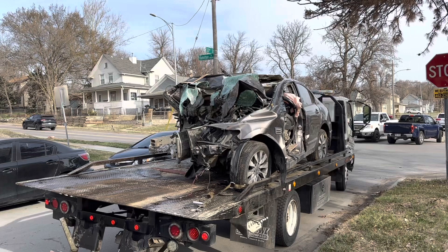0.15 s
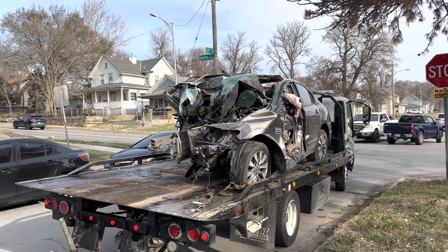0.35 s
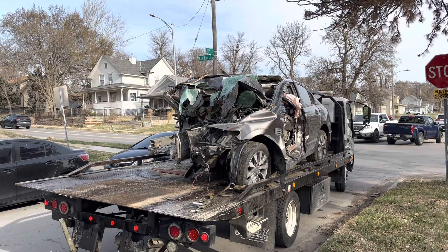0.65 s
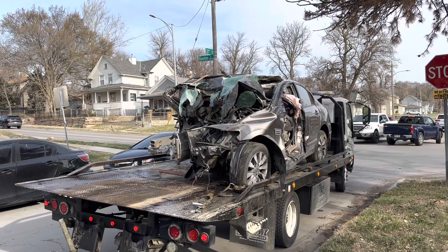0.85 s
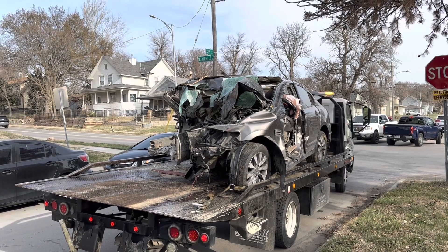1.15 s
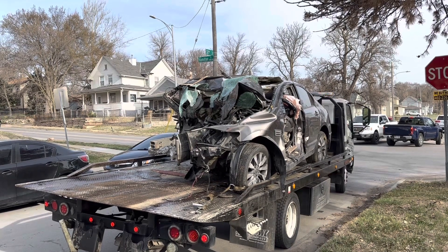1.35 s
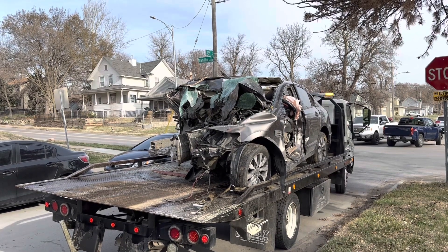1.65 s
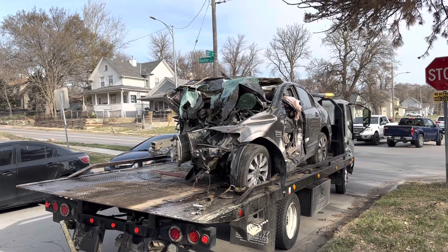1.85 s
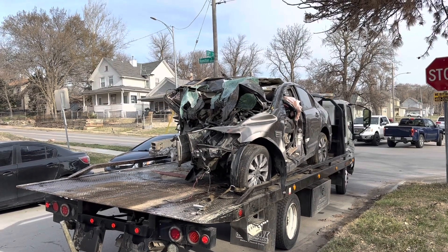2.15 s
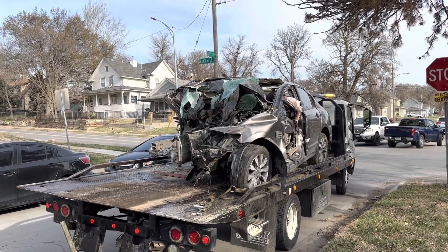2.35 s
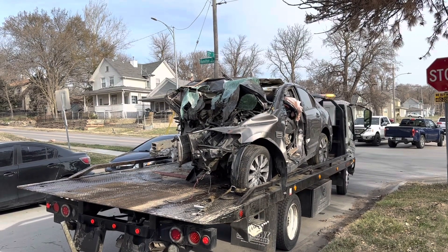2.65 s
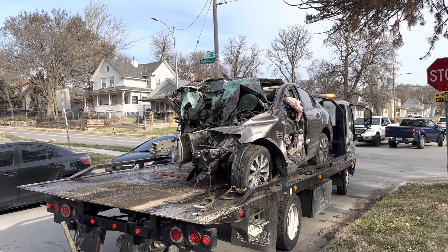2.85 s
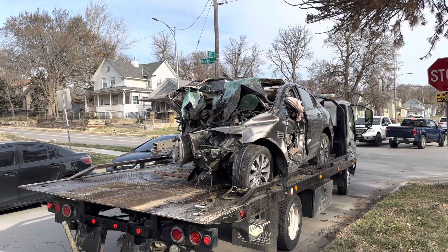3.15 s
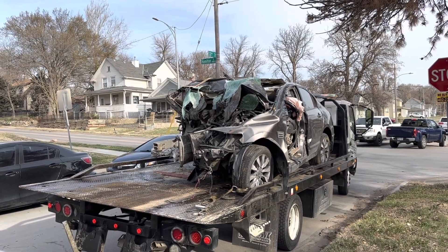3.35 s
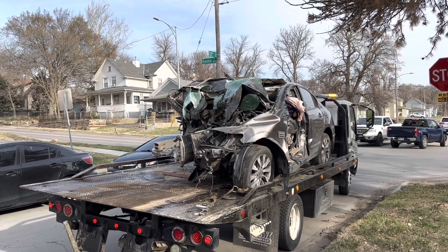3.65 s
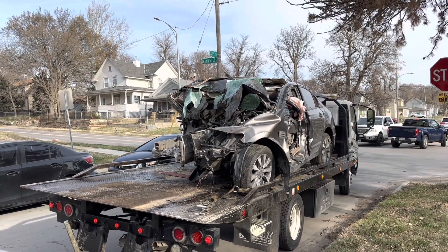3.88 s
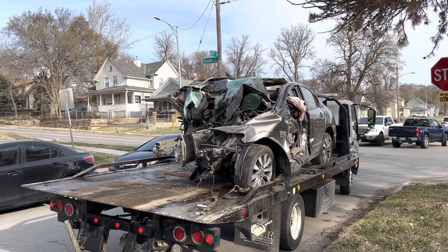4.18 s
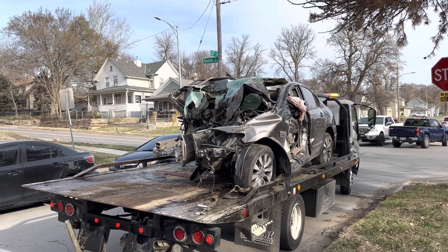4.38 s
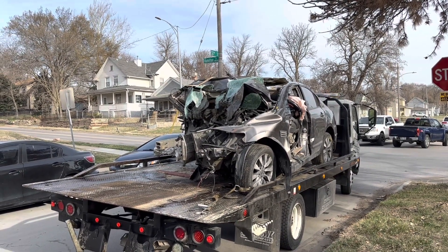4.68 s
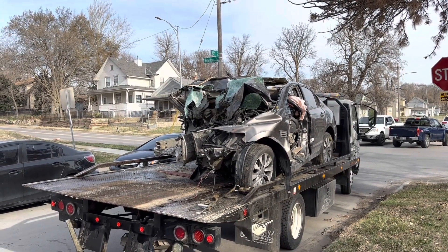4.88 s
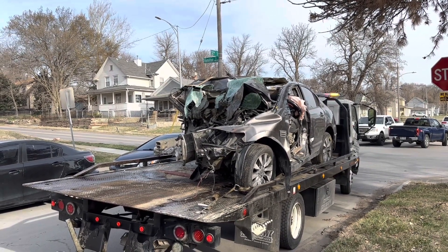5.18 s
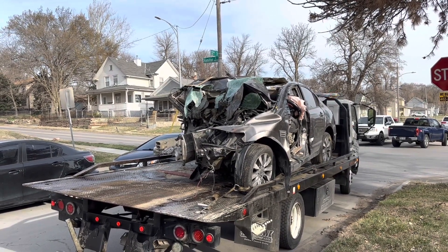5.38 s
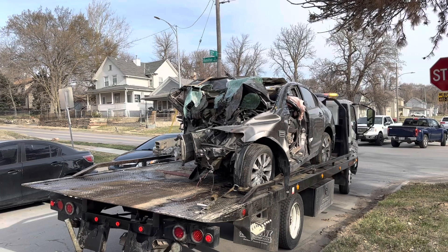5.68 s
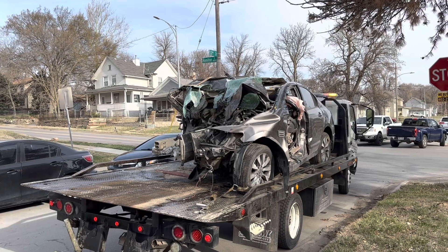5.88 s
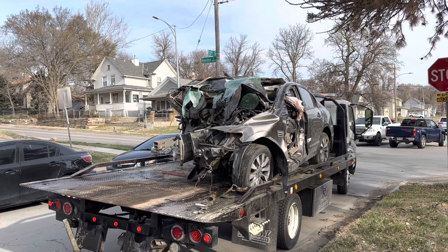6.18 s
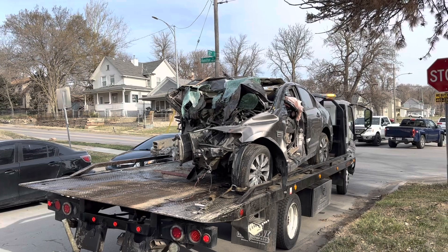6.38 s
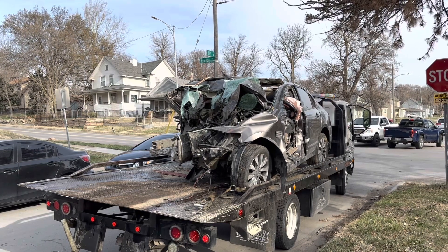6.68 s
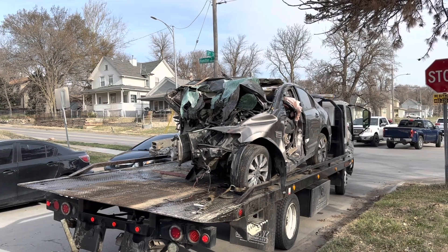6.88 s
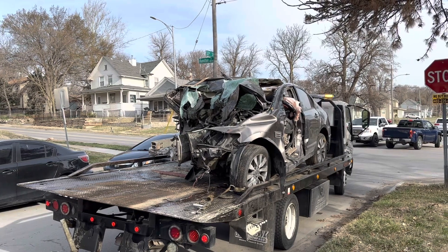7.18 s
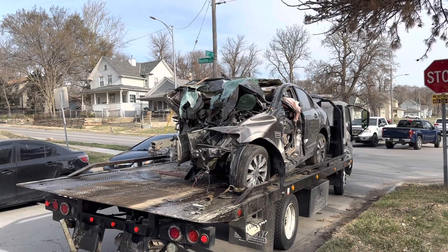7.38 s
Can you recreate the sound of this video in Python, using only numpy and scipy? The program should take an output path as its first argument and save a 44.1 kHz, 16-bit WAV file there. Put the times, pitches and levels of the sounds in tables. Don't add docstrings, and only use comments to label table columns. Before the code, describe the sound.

Close outdoor stereo recording of an idling truck engine, constant throughout: quick rattling knocks, dry valve clatter and a mid-pitched whine, with exhaust hum strongest at the start. Wind soon buffets the microphone with dull, boomy puffs and sharper pops, densest in the first half and hardest just after four seconds. The gusts thin out, leaving the engine clear, then return briefly around six and seven seconds.

```python
import sys
import numpy as np
from scipy import signal
from scipy.fft import rfft, irfft
from scipy.io import wavfile

SR = 44100
rng = np.random.default_rng(int(sys.argv[2]) if len(sys.argv) > 2 else 0)


def store_pcm(level_fs):
    pcm = np.round(np.clip(level_fs, -1, 1) * 32767).astype(np.int16)
    wavfile.write(sys.argv[1], SR, np.atleast_2d(pcm).T)


def amplitude_ratio(level_db):
    exponent = np.asarray(level_db, float) / 20
    return 10 ** exponent


N = 332066

CYCLE_HZ = 10.832
LEFT_RIGHT = np.array([[1], [-1]])

FIRING_STRENGTH = [0.5, -2.5, -0.5, 5.0, -3.0, 0.5, -1.5, -2.5]
# time_s, change_db
WIND_FILTER_DIP = [(0, 0), (1.74, 0.5), (1.97, -4.5), (2.6, -6.5), (2.9, -7.5), (3.73, -1.5), (4.07, 0),
                   (4.3, -6), (4.6, -2), (5.35, -1.5), (6.06, -2.5), (6.48, -0.5), (7.53, -1)]


def rms_one(x):
    return x / np.sqrt(np.mean(x ** 2) + 1e-20)


def in_time(rows):
    s, *columns = np.transpose(rows)
    return [np.interp(np.arange(N) / SR, s, c) for c in columns]


def at_hz(points, hz):
    table_hz, value = np.transpose(points)
    return np.interp(np.log(hz + 1), np.log(table_hz + 1), value)


def drift(rate_hz):
    r = np.exp(-80 * np.pi * rate_hz / SR)
    noise = rng.standard_normal(N // 40 + 4002)
    slow = signal.lfilter([1], [1, -2 * r, r * r], noise)[4000:]
    return np.interp(np.arange(N) / 40, np.arange(len(slow)), rms_one(slow - slow.mean()))


def band(x, low_hz, high_hz):
    sos = signal.butter(2, [low_hz, min(high_hz, .45 * SR)], "band", fs=SR, output="sos")
    return signal.sosfilt(sos, x)


def knock(cycles):
    # pitch_hz, level_db (rms), ring_s (time to fall 60 dB)
    block_tones = [(740, -47, .08), (870, -47, .11), (895, -51, .1), (945, -54, .1), (986, -48.5, .15),
                   (1035, -57, .1), (1116, -49, .15), (1153, -54, .12), (1212, -49, .12), (1257, -52, .12),
                   (1300, -49, .12), (1386, -50, .25), (1428, -50, .22), (1552, -51.5, .2),
                   (1640, -54, .15), (1850, -55, .2), (1891, -51.5, .18), (1933, -53, .25),
                   (2160, -56, .15), (2268, -53.5, .25), (2310, -55, .25), (2429, -52, .25),
                   (2549, -57, .2), (2771, -57, .25), (2650, -57, .05), (2860, -58, .05), (2939, -57, .25),
                   (4160, -63, .1), (4245, -61, .1), (4330, -66, .1), (1050, -51, .045), (1200, -53, .03),
                   (1480, -55, .04)]
    firing = np.floor(8 * cycles).astype(int)
    at = np.flatnonzero(np.diff(firing)) + 1
    cylinder = firing[at] % 8
    strength = amplitude_ratio(np.array(FIRING_STRENGTH))
    out = np.zeros((2, N))
    for hz, db, ring_s in block_tones:
        coupling = .35 + .8 * rng.standard_normal((2, 8))
        coupling[:, 3] = 1.35 * rng.choice([-1, 1], 2) * min(1, 1300 / hz) ** 2
        loose = np.clip((hz / 2200) ** 3, .13, 1)
        steady_hits = (strength * coupling)[:, cylinder]
        chance_hits = rng.standard_normal((2, len(at)))
        clicks = np.full((2, N), 1e-18)
        clicks[:, at] = (1 - loose) * steady_hits + loose * chance_hits
        r = amplitude_ratio(-60 / (max(ring_s, .005) * SR))
        w = 2 * np.pi * hz / SR
        rung = signal.lfilter([0, np.sin(w)], [1, -2 * r * np.cos(w), r * r], clicks)
        out += amplitude_ratio(db) * rung / np.std(rung, axis=1, keepdims=True)
    return amplitude_ratio(-0.5) * rfft(out)


def clatter(cycles):
    # pitch_hz, level_db (per Hz)
    clatter_colour = [(30, -25), (45, 5), (150, 0.5), (240, 2.5), (450, 0), (900, 2.5), (1600, -0.5),
                      (2950, -7), (3150, -9.5), (4300, -12), (6500, -20.5), (9000, -27.5), (12000, -33.5),
                      (15800, -33)]
    # pitch_hz, share (0-1)
    repeating_share = [(60, 0.45), (1200, 0.42), (1800, 0.18), (5000, 0.08), (12000, 0.05)]
    level_db = -37.5
    hz = np.arange(N // 2 + 1) * SR / N
    firing = 8 * cycles
    strength_db = np.array(FIRING_STRENGTH)[firing.astype(int) % 8]
    beat = amplitude_ratio(0.15 * strength_db - 0.5 * (firing % 1))
    place_in_cycle = (cycles % 1 * SR / CYCLE_HZ).astype(int)
    pattern = rng.standard_normal((2, 5000))[:, place_in_cycle]
    fresh = rng.standard_normal((2, N))
    share = np.clip(at_hz(repeating_share, hz), 0, 1)
    ripple_db = 1.5 * np.interp(hz, np.arange(800) * 30, rng.standard_normal(800))
    ripple_db = ripple_db * np.clip(hz / 2500 - .8, 0, 1)
    noise = np.sqrt(share) * rfft(beat * pattern) + np.sqrt(1 - share) * rfft(beat * fresh)
    both = amplitude_ratio(at_hz(clatter_colour, hz) + ripple_db) * noise
    return amplitude_ratio(level_db) * both / np.sqrt(2 * np.sum(np.abs(both[0, hz > 700]) ** 2)) * N


def two_ports(direct, scattered):
    # pitch_hz, likeness (0-1), left_lead_radians, left_minus_right_db
    port_rows = [(60, .96, 0, .8), (700, .8, 0, .5), (1300, .4, -1.6, -4), (1600, .35, -.6, -6),
                 (1900, .75, .1, .5), (2300, .55, .4, 1.5), (2900, .55, 1.1, 6.3), (3500, .2, -.4, 2),
                 (4150, .7, .3, -2), (5100, .15, .4, 2.5), (6900, .4, 2.6, 1.2), (7500, .1, 2.8, .8)]
    treble_rows = [(8300, .9, 0, 0), (8900, .9, 0, 0), (9600, .5, -1.2, 0), (10350, 1, -np.pi, 0),
                   (12350, 1, -np.pi, 0), (12750, .5, -1.5 * np.pi, 0), (13200, 1, -2 * np.pi, 0)]
    hz, *columns = np.transpose(port_rows + treble_rows)
    alike, lead, lean_db = [np.interp(np.arange(len(direct)) * SR / N, hz, c) for c in columns]
    alike = np.clip(alike, 0, 1)
    right = alike * np.exp(-1j * lead) * direct + np.sqrt(1 - alike ** 2) * scattered
    return irfft(np.array([direct * amplitude_ratio(lean_db / 2), right * amplitude_ratio(-lean_db / 2)]), N)


def whine(cycles):
    # time_s, level_db
    thrum_fade = [(0, -26), (1.7, -32.5), (2.0, -46), (4.3, -43), (4.6, -56), (7.53, -47)]
    pump_hz, pump_db, octave_db = 292.65, -37.5, -33.5
    port_lead = 0.096
    (cut_db,), (thrum_db,) = in_time(WIND_FILTER_DIP), in_time(thrum_fade)
    stroke = 2 * np.pi * pump_hz * np.arange(N) / SR + .25 * drift(2.5)
    stroke = stroke + port_lead * LEFT_RIGHT
    throb_db = 2.0 * drift(10.4) + 2.6 * np.cos(2 * np.pi * cycles + 0.28)
    octave = amplitude_ratio(octave_db + cut_db + 0.43 * drift(14.0)) * np.sin(2 * stroke)
    pump = amplitude_ratio(pump_db + cut_db - 1.5 + throb_db) * np.sin(stroke)
    thrum = np.sin(8 * np.pi * cycles) + amplitude_ratio(-7.0) * np.sin(16 * np.pi * cycles + 1)
    return np.sqrt(2) * (octave + pump + amplitude_ratio(thrum_db - 6.5) * thrum)


def eddies():
    # peak_s, peak_db, pitch_hz
    deep_thumps = [(1.432, -19, 160), (1.46, -14, 60), (1.466, -17, 130), (1.488, -24, 160),
                   (1.53, -11.5, 148), (1.556, -16.5, 120), (1.641, -18.5, 120), (1.67, -20.0, 160),
                   (1.701, -11.5, 120), (1.708, -18, 60), (1.734, -11, 159), (1.741, -23, 70),
                   (1.747, -6, 150), (1.757, -21.0, 150), (1.776, -16, 70), (1.799, -10.5, 150),
                   (1.817, -19.5, 80), (2.018, -22, 150), (2.1, -21, 120), (2.121, -17, 150),
                   (2.177, -16, 100), (2.352, -21, 130), (2.529, -22, 160), (2.551, -21, 160),
                   (2.573, -15, 80), (2.649, -22, 150), (2.663, -14.0, 80), (2.867, -20, 120),
                   (2.939, -18, 70), (3.111, -18, 99), (3.123, -16, 160), (3.239, -17.5, 101),
                   (3.29, -22, 90), (3.312, -20, 90), (3.325, -17, 150), (3.441, -16.5, 150),
                   (4.027, -17.5, 120), (4.138, -9, 99), (4.163, -21, 80), (4.247, -18, 150),
                   (4.264, -16.5, 120), (4.285, -17, 130), (4.295, -18, 70), (4.337, -18.5, 150),
                   (4.384, -24, 160), (4.477, -25, 120), (4.712, -16.5, 150), (4.861, -19.5, 120),
                   (4.904, -21, 80), (5.248, -23, 99), (6.217, -17.0, 160), (6.27, -15, 100),
                   (6.322, -18.5, 130), (6.342, -22, 70), (7.09, -19, 160), (7.117, -15.5, 100),
                   (7.133, -19.0, 120), (7.164, -15, 120), (7.186, -20, 120), (7.2, -18, 160)]
    middling_puffs = [(1.427, -17.5, 250), (1.465, -10, 230), (1.523, -16, 250), (1.531, -16.0, 310),
                      (1.696, -16.5, 250), (1.721, -16.5, 250), (1.766, -10.5, 180), (1.779, -21, 180),
                      (1.805, -16.5, 250), (1.957, -10, 304), (1.972, -15.5, 201), (2.011, -15.5, 249),
                      (2.039, -19, 180), (2.092, -14.0, 180), (2.107, -14, 200), (2.148, -16.5, 180),
                      (2.205, -16.5, 250), (2.232, -19, 200), (2.25, -16.5, 310), (2.266, -16.0, 228),
                      (2.558, -11.5, 310), (2.618, -16, 280), (2.631, -21, 250), (2.673, -16, 180),
                      (2.7, -17.0, 230), (3.119, -10.5, 250), (3.125, -19, 312), (3.287, -15.5, 202),
                      (3.298, -12.5, 310), (3.314, -12.5, 200), (3.337, -12, 250), (3.593, -13.5, 305),
                      (4.085, -16, 250), (4.119, -18.0, 180), (4.131, -15, 310), (4.136, -5.5, 202),
                      (4.153, -14, 230), (4.177, -16, 180), (4.228, -20, 179), (4.257, -20, 310),
                      (4.278, -11, 200), (4.304, -17, 200), (4.399, -16.5, 310), (4.408, -16, 310),
                      (4.441, -13, 310), (4.492, -18, 250), (4.843, -16, 200), (4.86, -19, 280),
                      (4.976, -15.5, 201), (5.241, -11.0, 228), (6.228, -15.0, 278), (6.267, -19, 250),
                      (6.317, -21, 230), (7.121, -11, 200), (7.172, -12, 250), (7.179, -12.5, 180),
                      (7.184, -8, 310), (7.226, -14, 230), (7.256, -13.5, 250), (7.268, -17, 180)]
    quick_snaps = [(1.741, -17, 390), (1.764, -18.5, 390), (1.798, -15.5, 350), (2.021, -16.5, 440),
                   (2.074, -17.5, 350), (2.091, -17, 390), (2.105, -17, 490), (2.116, -18, 350),
                   (2.2, -19, 390), (2.222, -25, 760), (2.223, -12, 443), (2.229, -18, 760),
                   (2.232, -12, 390), (2.256, -16, 390), (2.261, -17, 550), (2.361, -16, 437),
                   (2.52, -16, 490), (2.526, -17, 440), (2.555, -12.5, 760), (2.557, -18, 550),
                   (2.587, -18, 390), (2.596, -15.5, 490), (2.626, -17.5, 760), (2.628, -13, 440),
                   (2.631, -16, 550), (2.641, -10.5, 350), (2.649, -11.5, 670), (2.65, -15.5, 350),
                   (2.657, -14.5, 487), (2.678, -17.0, 390), (2.891, -16, 440), (2.919, -15, 350),
                   (3.101, -15, 355), (3.234, -13.5, 344), (3.295, -22, 550), (3.332, -15.5, 606),
                   (4.082, -19.5, 490), (4.128, -15.5, 950), (4.129, -5, 494), (4.131, -22, 680),
                   (4.139, -21, 390), (4.147, -18.5, 390), (4.222, -12, 352), (4.23, -12.5, 352),
                   (4.248, -13.5, 392), (4.276, -18, 610), (4.379, -14.0, 390), (4.384, -16.5, 350),
                   (4.394, -9.5, 350), (4.448, -19, 350), (4.894, -19.5, 487), (4.949, -18, 350),
                   (6.26, -19.0, 390), (6.34, -21, 390), (7.116, -16.5, 390), (7.191, -20, 440),
                   (7.223, -17.5, 490), (7.261, -20, 680), (7.261, -14.0, 350), (7.269, -18.0, 350)]
    stray_eddies = [(.27, -20.5, 150), (.505, -25.5, 190), (1.239, -22, 170), (1.308, -18.5, 192),
                    (1.89, -20.5, 250), (2.293, -21, 300), (2.33, -22, 200), (2.385, -18.5, 250),
                    (2.733, -19.5, 400), (2.82, -17, 400), (2.826, -17.5, 230), (2.997, -20.5, 190),
                    (3.358, -21, 330), (3.398, -23, 300), (3.555, -15, 220), (3.662, -20, 192),
                    (3.791, -22, 180), (3.855, -23.5, 180), (4.515, -22, 250), (4.58, -23, 200),
                    (4.665, -23, 200), (4.9, -18, 190), (4.967, -19, 260), (5.1, -20, 170),
                    (5.162, -17, 190), (5.425, -17.5, 230), (5.445, -23, 110), (5.855, -25.5, 180),
                    (6.14, -17.5, 250), (6.16, -19, 330), (6.185, -19.5, 150), (6.95, -22, 250),
                    (7.015, -21, 280), (6.2, -22, 330), (6.295, -18, 200), (6.409, -21.5, 200),
                    (6.891, -23.5, 179), (7.08, -20, 300), (7.332, -23, 110)]
    half_cycles, lost_per_db = 0.8, 0.05
    before = SR // 25
    t = np.arange(-before, SR // 12) / SR
    out = np.zeros((2, N + SR))
    rows = deep_thumps + middling_puffs + quick_snaps + stray_eddies
    chance = rng.standard_normal((len(rows), 3))
    for (s, db, hz), (phase, shift, pan) in zip(rows, chance):
        span = t * hz / np.clip(half_cycles - lost_per_db * (db + 16), .3, 1)
        swell = np.exp(-np.where(t < 0, 1.2, .45) * span ** 2)
        falling = 2 * np.pi * hz * t * (1 - 0.13 * np.clip(span, -3, 3))
        angle = falling + 3 * phase + 0.18 * shift * LEFT_RIGHT
        lean = amplitude_ratio((0.7 + 1.3 * pan) * LEFT_RIGHT)
        i = round(s * SR) - before
        out[:, i:i + len(t)] += amplitude_ratio(db) * lean * swell * np.sin(angle)
    return out[:, :N]


def wind_levels():
    # time_s, level_db
    breeze_curve = [(0, -34.5), (1.1, -36), (1.35, -30), (2.4, -28.5), (3.0, -35), (3.9, -30), (4.6, -29.5),
                    (5.1, -30), (5.5, -42), (6.05, -32), (6.55, -37), (6.87, -42), (6.9, -30), (7.33, -30),
                    (7.37, -37), (7.53, -38.5)]
    # start_s, hold_s, rumble_db, flutter_db (relative to the rumble)
    gust_rows = [(1.446, .035, -19.5, -8.5), (1.515, 0.051, -21.5, -10), (1.624, .03, -28, -19),
                 (1.703, 0.088, -20.5, -2.5), (1.957, 0.11, -27, 5.5), (2.075, 0.097, -24.5, 5.5),
                 (2.21, 0.078, -30, 8.5), (2.29, 0.11, -25.5, 6.5), (2.52, 0.044, -21, 2),
                 (2.597, 0.096, -23, 6.5), (2.813, 0.01, -23.5, 3), (2.875, 0.12, -23.5, -5),
                 (3.106, 0.038, -22, 1.5), (3.242, 0.024, -25.5, 3), (3.278, 0.083, -22.5, 6.5),
                 (3.532, 0.13, -22.5, -2), (4.018, 0.04, -26, -9), (4.08, .015, -29, 6),
                 (4.13, 0.043, -21.5, 2), (4.226, .085, -20, 5), (4.363, 0.033, -25.5, 9),
                 (4.438, 0.059, -27, 6), (4.836, 0.063, -23, 0.5), (4.94, 0.036, -33, 5),
                 (5.213, 0.035, -23, 1.5), (5.414, 0.026, -26.5, 4.5), (6.134, 0.099, -23.5, 2.5),
                 (6.25, 0.093, -21.5, 2.5), (7.078, 0.072, -20, -2), (7.159, 0.12, -22, 0)]
    rise_db_per_s, fall_db_per_s = 599, 450
    breeze_flutter_db = 1
    between_eddies_db = -2.5
    t = np.arange(0, N, 20) / SR
    breeze_db = in_time(breeze_curve)[0][::20]
    rumble = amplitude_ratio(2 * breeze_db)
    flutter = amplitude_ratio(2 * (breeze_db + breeze_flutter_db))
    for s, hold, db, flutter_db in gust_rows:
        rise_db = rise_db_per_s * np.clip(s - t, 0, 1)
        fall_db = fall_db_per_s * np.clip(t - s - hold, 0, 1)
        shape_db = db + between_eddies_db - rise_db - fall_db
        rumble = rumble + amplitude_ratio(2 * shape_db)
        flutter = flutter + amplitude_ratio(2 * (shape_db + flutter_db))
    return [np.interp(np.arange(N) / SR, t, 10 * np.log10(power)) for power in (rumble, flutter)]


def gusts():
    rumble_db, flutter_db = wind_levels()
    lumps = np.tanh(drift(25.0))
    common, own = rng.standard_normal((2, 3, N))
    # low_hz, high_hz, level_db, lumpiness_db
    layers = [(37, 155, rumble_db - 1.5, 2.6),
              (130, 361, flutter_db - 7.0, 5.7),
              (376, 830, 2.0 * flutter_db - 4.5, 5.2)]
    mid = side = 0
    for k, (low_hz, high_hz, level_db, lumpy_db) in enumerate(layers):
        gain = amplitude_ratio(level_db) * rms_one(amplitude_ratio(lumpy_db * lumps))
        mid = mid + gain * rms_one(band(common[k], low_hz, high_hz))
        side = side + gain * rms_one(band(own[k], low_hz, high_hz))
    return mid + amplitude_ratio(-8.0) * side * LEFT_RIGHT


def ticks():
    # start_s, level_db, pitch_hz, width_hz, ring_s (time to fall 60 dB)
    tick_rows = [
        (3.984, -40, 6800, 6500, 0.0035),
        (4.885, -46, 6500, 500, 0.025),
        (4.905, -47, 6350, 500, 0.033),
        (2.519, -25, 790, 500, .012),
        (2.554, -25, 1000, 500, 0.008),
        (2.624, -27, 1000, 600, 0.01),
        (4.127, -26, 1300, 600, 0.008),
        (4.127, -13, 730, 430, 0.011),
        (2.222, -25, 750, 470, .012),
        (4.219, -29, 650, 400, 0.011),
    ]
    out, t = np.zeros(N), np.arange(N) / SR
    hiss = rng.standard_normal(N)
    for s, db, hz, width_hz, ring_s in tick_rows:
        fade = amplitude_ratio(db - 60 * np.clip(t - s, 0, 1) / ring_s) * (t >= s)
        burst = fade * hiss * np.sqrt(SR / 2 / width_hz)
        narrow = band(burst + 1e-18, hz - width_hz / 2, hz + width_hz / 2)
        out += band(narrow, hz / 4, hz * 3.2)
    return out


def scene():
    cycles = CYCLE_HZ * np.arange(N) / SR + .965 + .0012 * drift(1.5)
    engine = two_ports(*(clatter(cycles) + knock(cycles)))
    engine = engine * amplitude_ratio(0.12 * in_time(WIND_FILTER_DIP)[0])
    tones = whine(cycles) * amplitude_ratio(-.3 * LEFT_RIGHT)
    return engine + tones + gusts() + eddies() + ticks()


def roll_off(x):
    return signal.sosfilt(signal.butter(12, 15960, fs=SR, output="sos"), x)


def record(dry):
    low = signal.sosfilt(signal.cheby2(12, 60, 16500, fs=SR, output="sos"), dry)
    cut = signal.sosfilt(signal.butter(4, 38.0, "high", fs=SR, output="sos"), low)
    rounded = cut / (1 + (cut / .9) ** 6) ** (1 / 6)
    return roll_off(rounded)


dry = scene()
out = record(dry)
store_pcm(out)
```